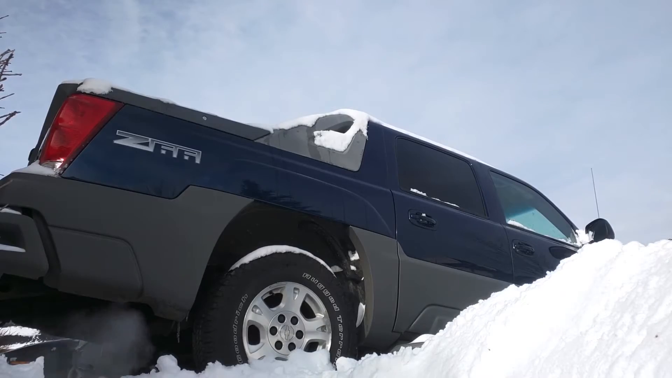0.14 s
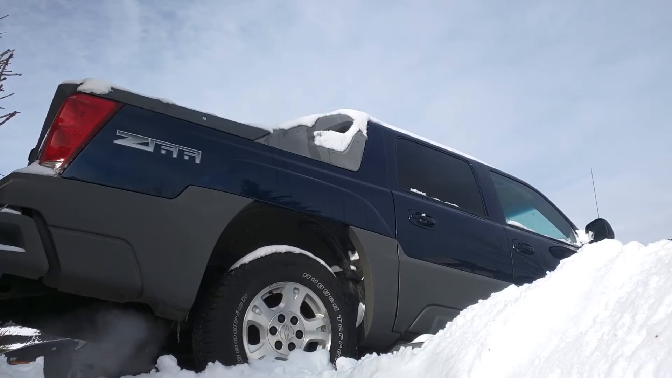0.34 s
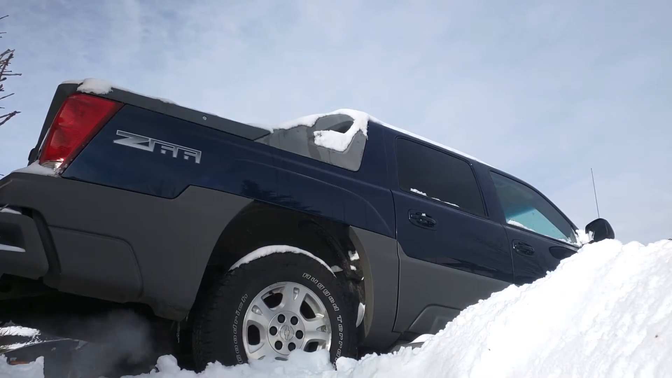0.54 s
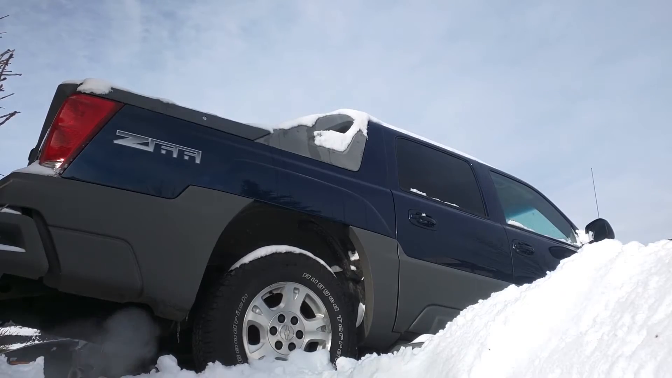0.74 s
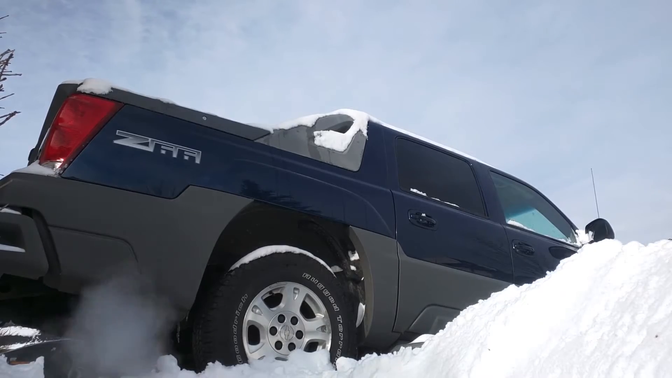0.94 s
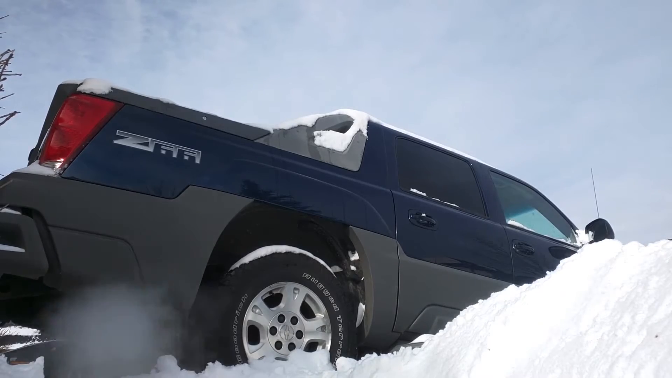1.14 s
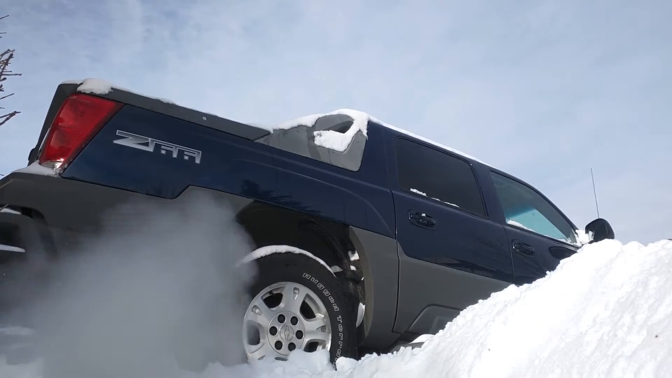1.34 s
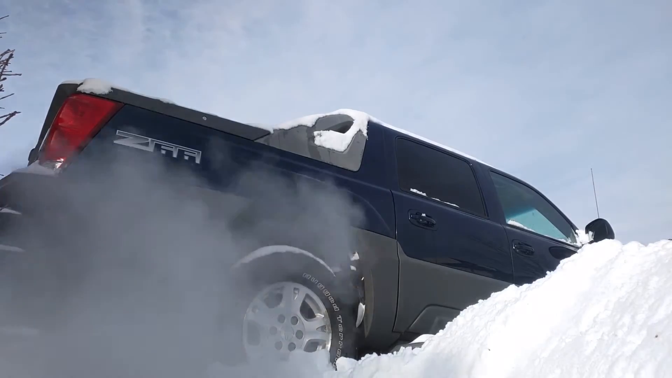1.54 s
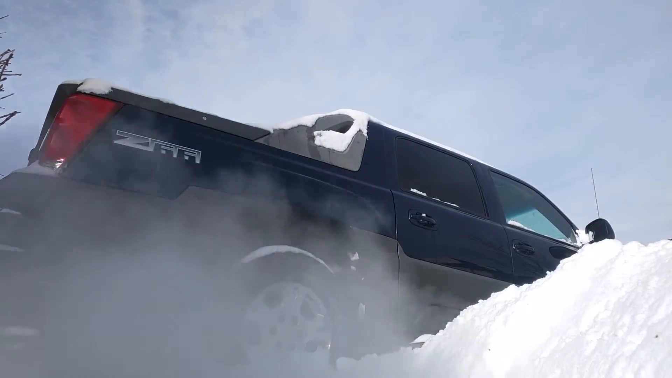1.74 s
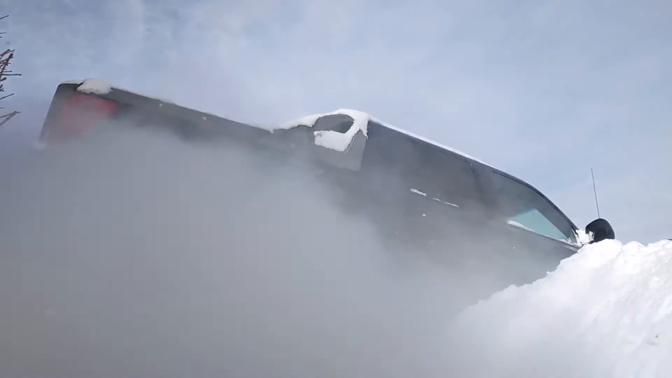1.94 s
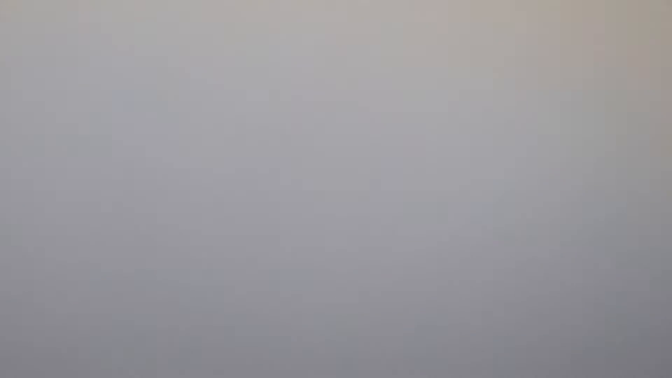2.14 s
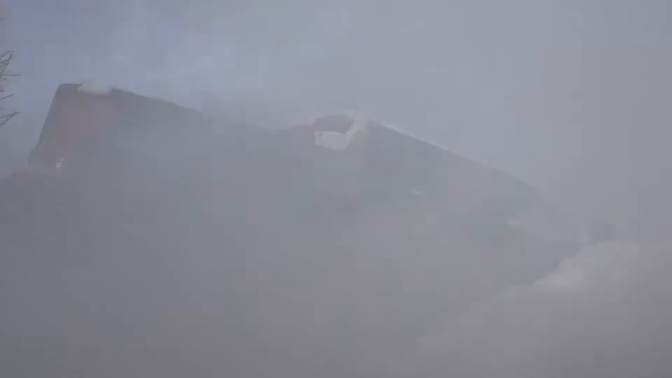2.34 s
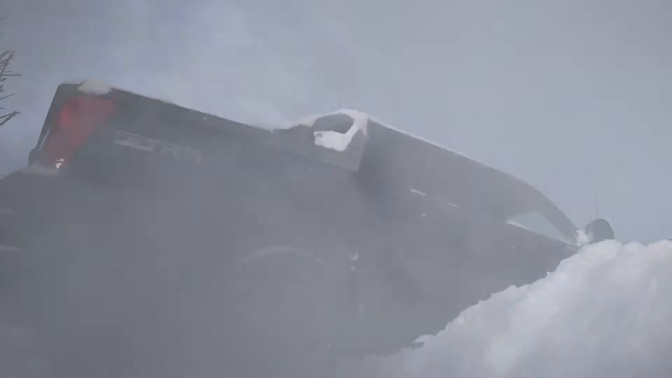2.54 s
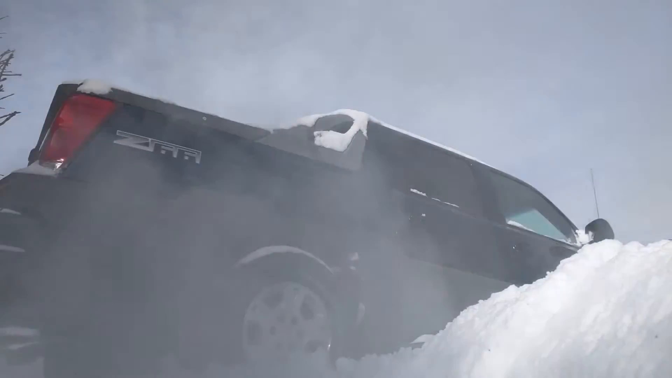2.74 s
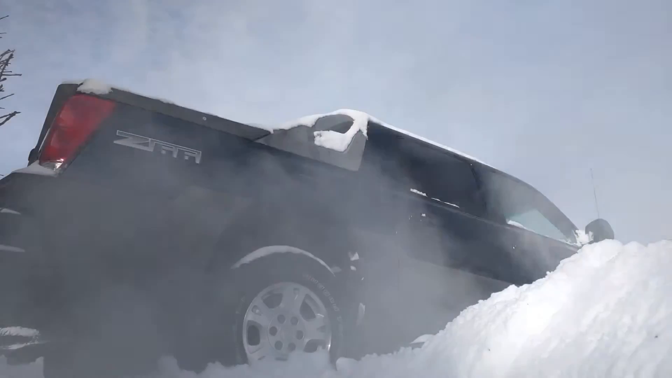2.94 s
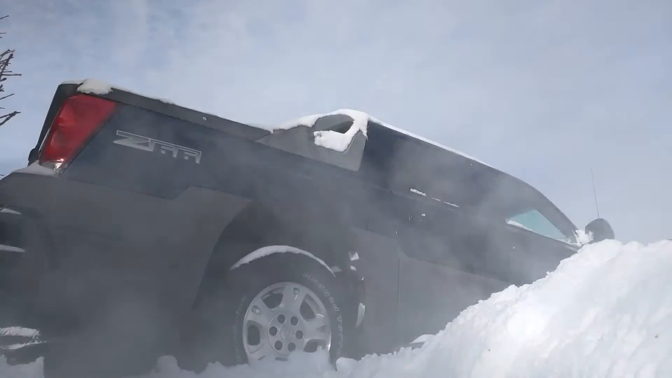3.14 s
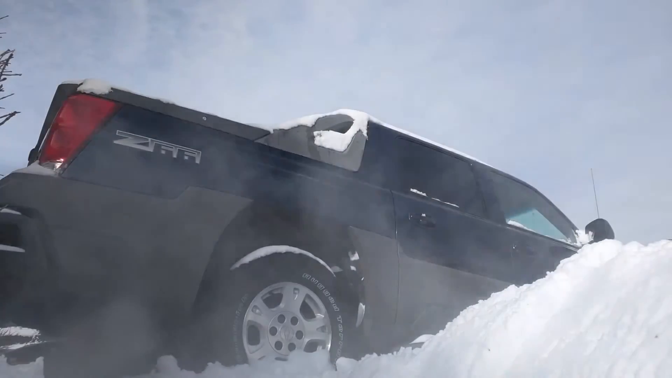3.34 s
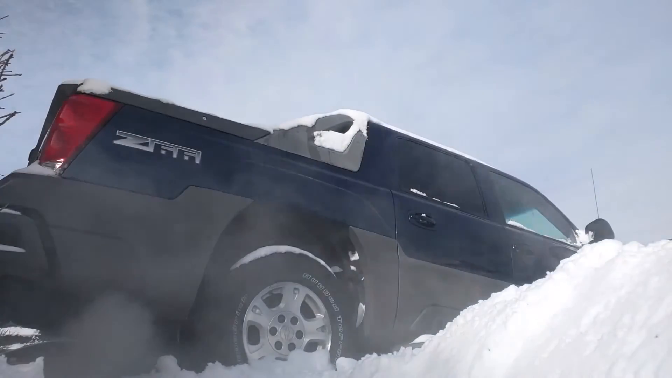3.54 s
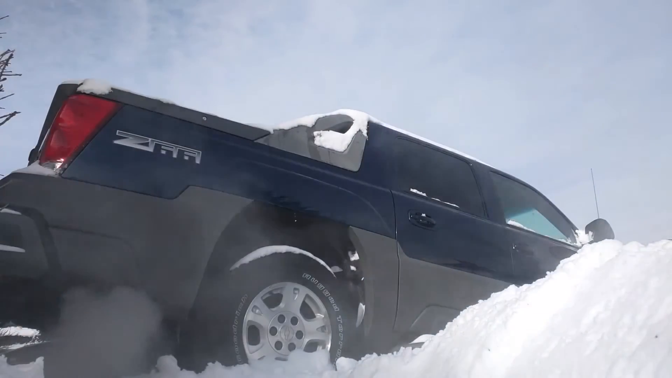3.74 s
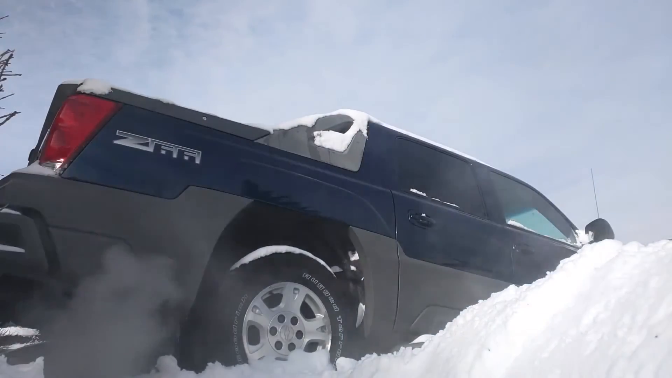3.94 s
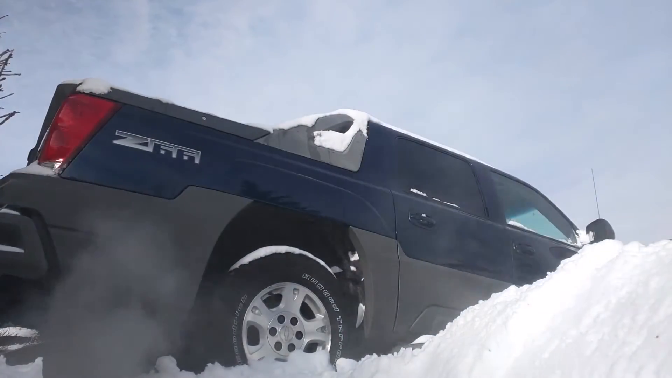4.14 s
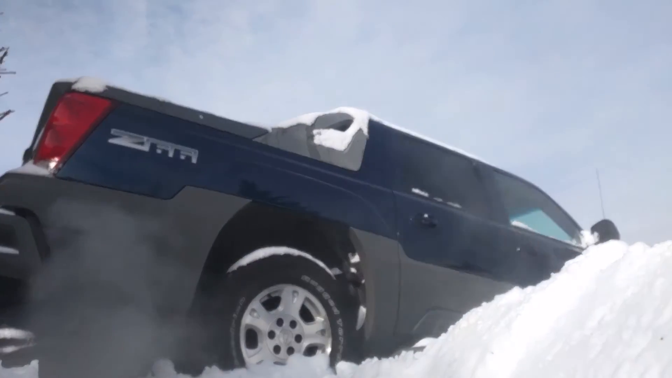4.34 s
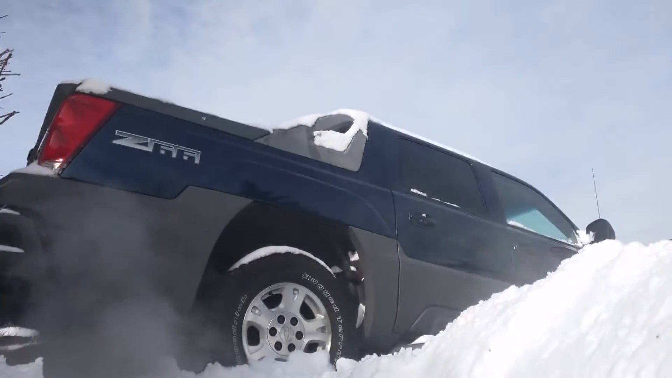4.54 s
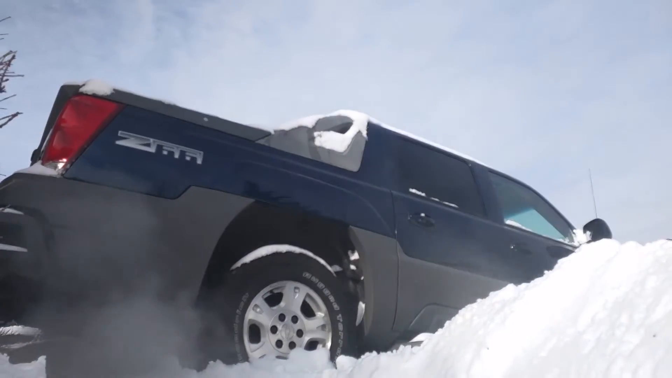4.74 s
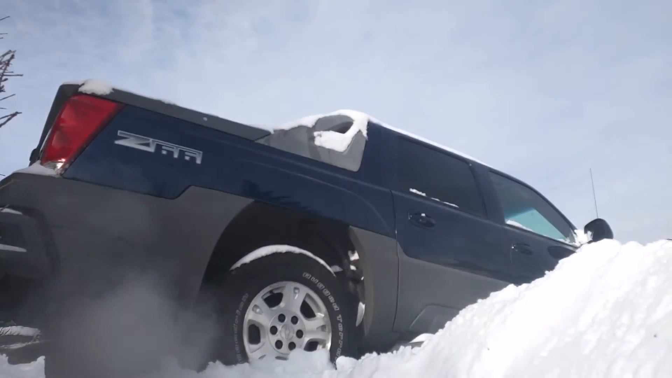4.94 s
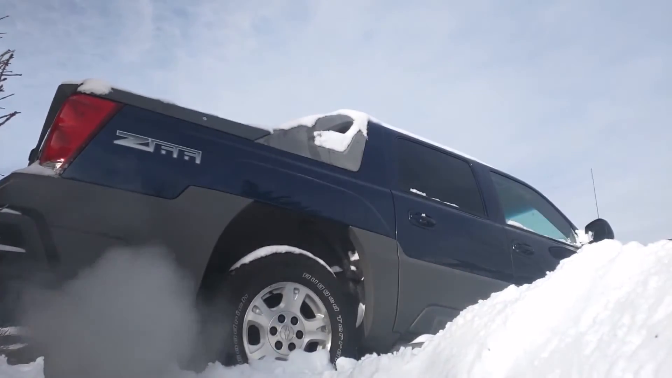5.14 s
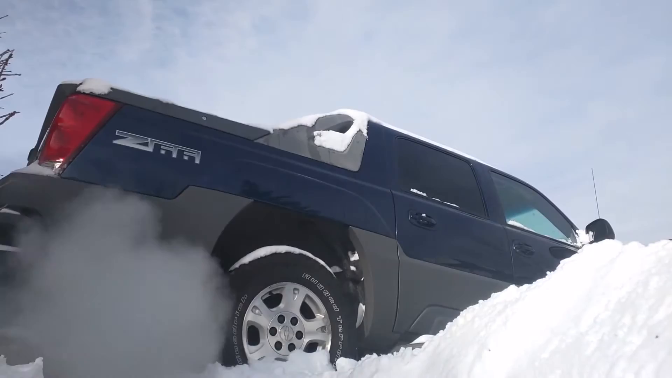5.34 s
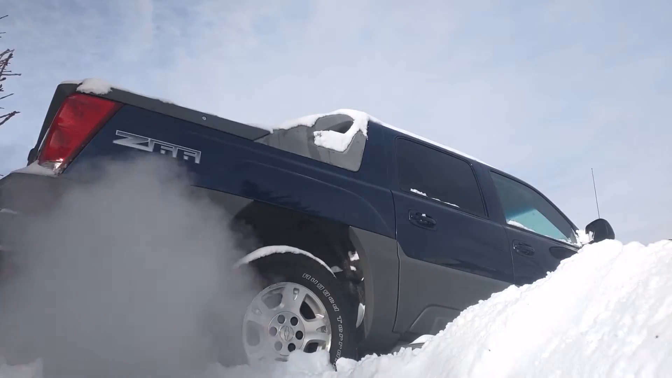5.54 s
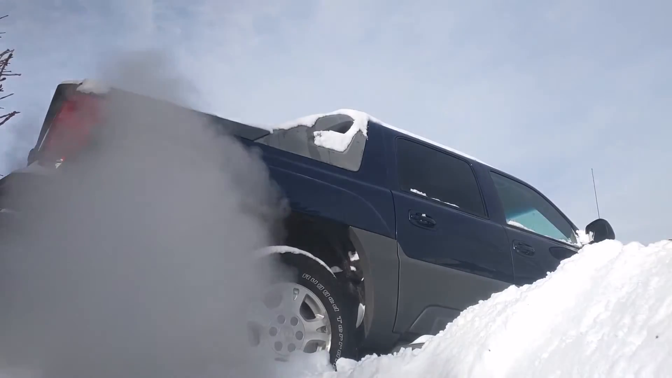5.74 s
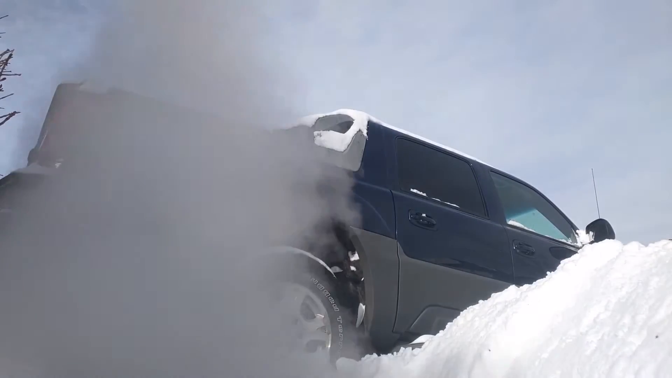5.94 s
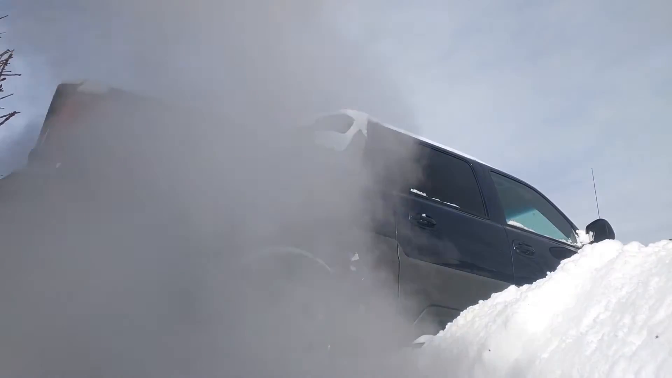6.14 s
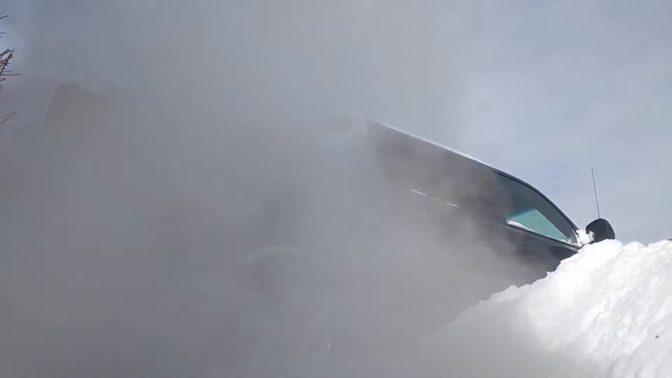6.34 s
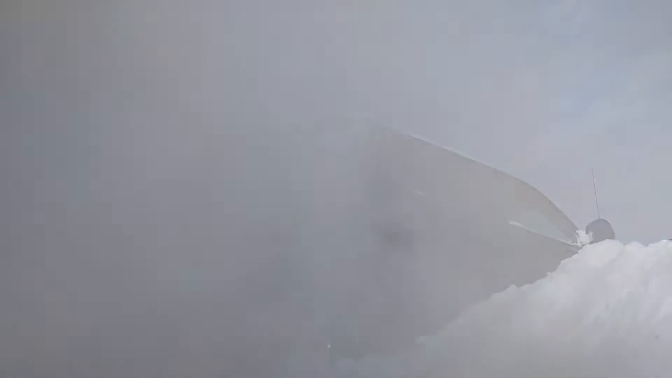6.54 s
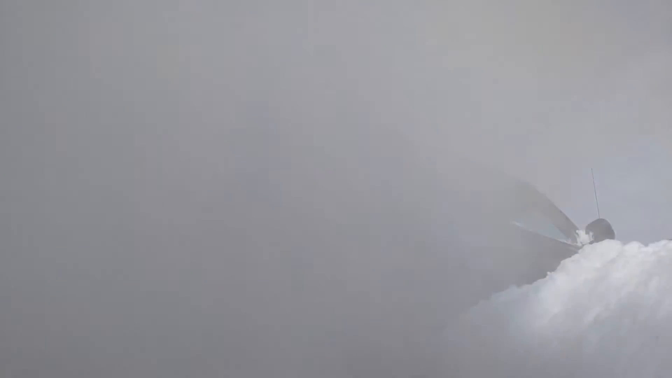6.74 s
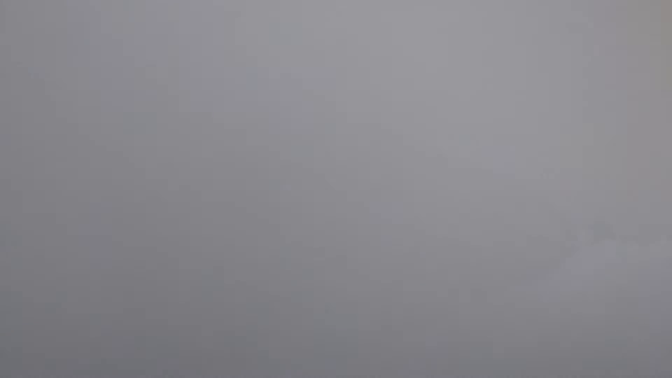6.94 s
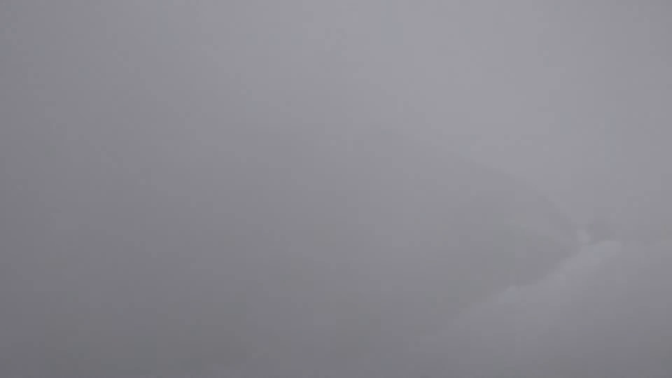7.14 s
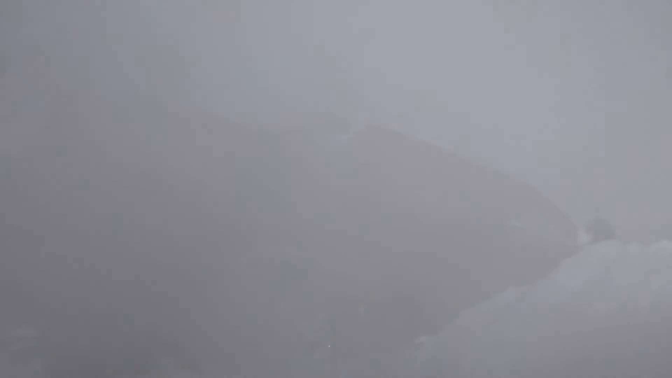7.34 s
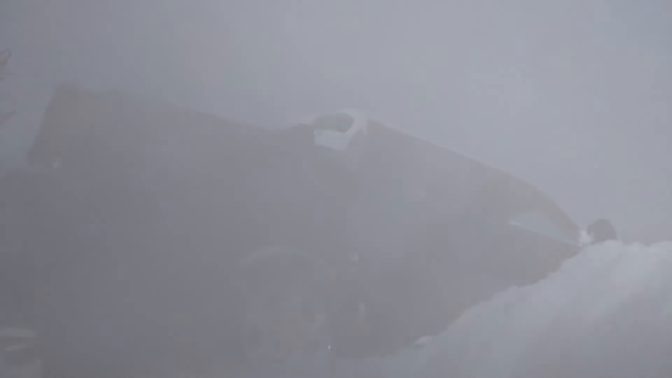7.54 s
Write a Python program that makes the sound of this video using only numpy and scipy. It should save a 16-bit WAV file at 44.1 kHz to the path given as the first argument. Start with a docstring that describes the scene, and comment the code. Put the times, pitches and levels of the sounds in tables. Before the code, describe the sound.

Outdoors, close behind a snowbound pickup, its big V8 idles with a low, uneven throb and clear metallic valve ticking. Three throttle stabs follow, the last a blaring roar, with a tyre hissing and crunching in snow. Exhaust gusts rumble over the microphone and specks spatter it. Revs sink to slow, hollow chugs with a few pops, then rise in one long howling pull and fall away in a droning burble.

```python
"""In deep snow, a stuck truck's cross-plane V8 idles, is blipped three times, sinks back, then is wound up in one long pull.
Speed and load set the levels: low orders boom through the pipe's resonances, orders and gas noise howl and puff,
slow firings chug, and pops, drones and hisses come from the tailpipe. Noise-driven taps ring the valve cover.
Thin metal rattles, a spinning tyre hisses and crunches, and the exhaust cloud buffets and spatters the microphone."""
import sys
import numpy as np
from scipy import signal
from scipy.fft import rfft, irfft, next_fast_len
from scipy.io import wavfile
from scipy.ndimage import map_coordinates

SR = 44100
rng = np.random.default_rng(int(sys.argv[2]) if len(sys.argv) > 2 else 0)


def unload_wav(signal):
    """Save mono or channel-first audio to the path in sys.argv[1] as 16-bit WAV at rate SR, clipped to [-1, 1]."""
    wavfile.write(
        sys.argv[1],
        SR,
        np.round(np.clip(np.atleast_2d(signal).T, -1, 1) * 32767).astype(np.int16),
    )


N = 334719
T = np.arange(N) / SR
IDLE_PER_S = 6.62  # four-stroke cycles per second

# Cylinders in firing order: (relative exhaust pulse strength, relative valve tick level [dB])
CYLINDERS = [(.92, -3), (.71, 2), (.86, -4), (.74, 5), (.81, -8), (.42, -5), (1.22, 2), (1.04, -6)]
# Boom orders: (order of the cycle, relative level with throttle shut [dB], more at full load [dB],
# more at idle [dB], share of the lope [0-1])
BOOM_ORDERS = [(1, 11.5, -5.5, -1.5, 0.18), (2, -2, -9.5, -8, 0.5), (3, 6, -5, -9.5, 1),
               (5, -9.5, 10, 2.5, 0), (6, -3.5, 2, -20, 0.1), (7, -19.5, 17.5, -17, 0),
               (8, -11, 19.5, 0.5, 0.08), (9, -10, -4.5, -16, 0.1), (11, -14, 12, -1.5, 0.28)]
# Upper resonances of the tailpipe: (frequency [Hz], relative level [dB])
RASP_COLOUR = [(500, -44.5), (710, -2.5), (770, 15), (855, 12.5), (930, 6), (1050, 6.5), (1230, 1.5),
               (1370, 6.5), (1520, 2.5), (1680, -7), (1850, -15), (2400, -37), (4000, -47.5)]


def amp(db):
    """Decibels to gain."""
    return 10 ** (np.asarray(db) / 20)


def unit(x):
    """Scales to rms 1."""
    return x / np.sqrt(np.mean(x ** 2) + 1e-20)


def noise():
    """White noise of rms 1."""
    return rng.standard_normal(N)


def wander(hz):
    """Slow random signal of rms 1, rolled off above the given rate."""
    size = next_fast_len(N)
    f = np.fft.rfftfreq(size, 1 / SR)
    spectrum = rfft(rng.standard_normal(size)) / (1 + (f / hz) ** 4)
    return unit(irfft(spectrum, size)[:N])


def grains(per_s, spread_db):
    """Random clicks of uneven size and either sign, rms 1."""
    hits = rng.random(N) < per_s / SR
    size = amp(spread_db * np.minimum(rng.exponential(1, N), 3))
    return unit(hits * size * np.sign(noise()))


def colour(x, points):
    """Minimum-phase filter with the given spectrum [Hz, dB] and unit energy."""
    hz, db = np.transpose(points)
    f = abs(np.fft.fftfreq(8192, 1 / SR))
    log_gain = np.log(amp(np.interp(np.log(f + 1), np.log(hz + 1), db)))
    ring = np.fft.ifft(np.exp(np.conj(signal.hilbert(log_gain)))).real[:len(f) // 2]
    return signal.oaconvolve(x, ring / np.linalg.norm(ring))[:N]


def lagged(x, lag_s):
    """One-pole smoothing with the given time constant."""
    keep = np.exp(-1 / (lag_s * SR))
    return signal.lfilter([1 - keep], [1, -keep], x)


def swell(peak_s, rise_s, fall_s):
    """A rounded rise to 1 and fall."""
    return np.exp(-((T - peak_s) / np.where(T < peak_s, rise_s, fall_s)) ** 2)


def swells(rows):
    """Joint gain of a table of swells, summed in power."""
    return np.sqrt(sum((amp(db) * swell(*shape)) ** 2 for *shape, db in rows))


def press(down_s, up_s, attack_s, lift_s=0.052):
    """One press of the pedal, 0-1: attack, hold, release."""
    attack = 1 - np.exp(-np.maximum(T - down_s, 0) / attack_s)
    return attack * np.exp(-np.maximum(T - up_s, 0) / lift_s)


def follow(law, speed, load):
    """Gain of a layer that follows speed and load."""
    idle_db, speed_db, load_db = law
    return amp(idle_db + speed_db * (speed - IDLE_PER_S) + load_db * load)


def idling(speed, span=1.2):
    """1 at idle, fading as the engine speeds up by span cycles per second."""
    return np.exp(-np.maximum(speed - IDLE_PER_S, 0) / span)


def add(mix, s, sound):
    """Mixes a sound in at the given time."""
    part = mix[max(round(s * SR), 0):][:len(sound)]
    part += sound[:len(part)]


def cloud(gust_db=2.0, breeze_db=-41, speck_db=4.0, spatter_db=-38, spread_db=6.0, knock_db=17, splash_s=0.00093):
    """The exhaust cloud rumbles over the microphone and spatters it; heavy specks knock on its case."""
    # Gusts on the microphone: (peak [s], rise [s], fall [s], relative level [dB])
    gust_swells = [(.95, 0.064, 0.15, -24.5), (1.62, 0.26, 0.24, -24), (2.65, 0.61, 0.44, -22.5),
                   (6.88, 0.94, 1, -41)]
    # Gust rumble: (frequency [Hz], relative level [dB])
    buffet_colour = [(5, -74), (15, 3), (28, -13.5), (55, -1), (90, -3.5), (130, -10.5), (200, -20),
                     (400, -14), (1200, -78.5)]
    # Fine spatter: (peak [s], rise [s], fall [s], peak rate [specks/s])
    spatter_swell = (2.19, 0.024, .15, 2400)
    # Largest specks: (time [s], relative level [dB])
    large_specks = [(1.682, -28), (1.69, -28), (1.735, -41), (2.1045, -12.5), (2.136, -25), (2.155, -16),
                    (2.166, -18), (2.173, -10.5), (2.203, -16), (2.314, -21), (2.428, -20), (2.463, -21),
                    (2.492, -20), (2.498, -23), (2.5198, -25), (2.532, -28), (2.733, -21), (2.7747, -21.5),
                    (2.787, -27), (2.892, -26), (2.9823, -31)]
    # Speck impact: (frequency [Hz], relative level [dB])
    speck_colour = [(800, -26), (2000, -2), (4000, -5), (6000, -1.5), (11000, -3), (16000, -7.5)]
    # Case knock: (frequency [Hz], relative level [dB])
    case_colour = [(800, -25), (1600, 4), (2200, -3), (3000, -12), (6000, -42)]
    gust_gain = np.hypot(amp(breeze_db), amp(gust_db) * swells(gust_swells))
    gusts = gust_gain * unit(colour(noise(), buffet_colour))

    *shape, per_s = spatter_swell
    hits = rng.random(N) < per_s * swell(*shape) / SR
    spatter = hits * amp(spatter_db + spread_db * np.minimum(rng.exponential(1, N), 3))

    s, peak_db = np.transpose(large_specks)
    large = np.zeros(N)
    large[np.round(s * SR).astype(int)] = amp(peak_db)
    # each large speck bursts into droplets
    splash = np.exp(-T[:SR // 50] / splash_s) * rng.standard_normal(SR // 50)
    burst = signal.oaconvolve(large, splash / np.linalg.norm(splash))[:N]
    specks = colour(spatter + amp(speck_db) * burst, speck_colour)
    knocks = amp(knock_db) * colour(large ** 2, case_colour)  # squaring favours the heaviest
    return gusts + specks + knocks


def tyre(gain, wheel_lag_s=0.0083):
    """The tread flings snow, a fine hiss with icy grains in it, and crunches in clumps where it bites."""
    # Flung snow: (frequency [Hz], relative level [dB])
    spray_colour = [(2500, -53), (5000, -4), (7000, 0), (10000, 3.5), (13000, -2.5), (16000, -8)]
    # Tread crunching on ice: (peak [s], rise [s], fall [s], level [dB])
    crunch_swells = [(.98, 0.073, 0.14, -44), (1.35, 0.018, 0.14, -41), (1.96, 0.094, 0.1, -42.5),
                     (2.41, 0.046, 0.049, -37.5), (2.62, 0.12, 0.037, -46), (7.0, 0.05, 0.088, -39),
                     (7.1, .008, .025, -36)]
    # Ice crunch: (frequency [Hz], relative level [dB])
    crunch_colour = [(1800, -33), (3000, 5), (3900, 1.5), (4900, 2), (6000, -4), (9000, -16), (16000, -37)]
    snow = noise() + grains(per_s=2500, spread_db=4)
    spray = lagged(gain, wheel_lag_s) * unit(colour(snow, spray_colour))
    ice = grains(per_s=1500, spread_db=3.5) * amp(4 * wander(hz=60))
    return spray + swells(crunch_swells) * unit(colour(ice, crunch_colour))


def rattle(cycles, hz=3700, width_hz=650, flutter_db=3):
    """Thin metal buzzes with the firings: gas puffs through a doubled resonance."""
    # Bouts of rattle: (peak [s], rise [s], fall [s], level [dB])
    rattle_swells = [(.96, .05, 0.13, -39), (1.34, .02, .14, -41), (2.445, 0.053, 0.02, -32),
                     (2.6, 0.063, 0.063, -47.5), (5.1, 0.13, 0.57, -45.5), (7.39, 0.15, 0.067, -41)]
    band = signal.iirpeak(hz, hz / width_hz, SR)
    buzz = puffs(cycles, steady=0.43, length=1.0)
    buzz = signal.lfilter(*band, signal.lfilter(*band, buzz))
    return swells(rattle_swells) * unit(buzz * amp(flutter_db * wander(hz=50)))


def valves(cycles, speed, load, level_db=-49.5, ring_s=0.0045, lag_cycles=-.015):
    """Each valve ticks once a cycle, three louder, over fine rocker chatter; all ring the cover."""
    # Dry tick: (frequency [Hz], relative level [dB])
    valve_colour = [(1200, -33), (2100, -2), (2450, 8), (2750, 5), (3500, 10), (4400, 8), (5000, 0),
                    (6400, -2), (7800, -3), (8500, -14), (9700, -9), (12000, -14), (15000, -22)]
    # Modes of the cover: (frequency [Hz], width [Hz], relative level [dB])
    cover_modes = [(2400, 30, 1), (2600, 50, -6), (2725, 45, -9), (3010, 50, -5), (3390, 110, 7),
                   (3560, 100, 8), (3690, 70, 5), (4460, 110, -4), (5070, 70, -8), (5380, 90, -10),
                   (5610, 90, -8), (7100, 200, -13), (7800, 150, -11), (9500, 400, -12), (12000, 900, -14)]
    tick_spread_db, mode_spread_db, chatter, cover_db = 1.2, 3.5, .3, 7
    later_db, load_db, speed_db = -5.5, 8, -.9  # speed_db is per cycle/s above idle

    tick_db = np.array(CYLINDERS)[:, 1]
    beat = np.floor((cycles - lag_cycles) * len(tick_db)).astype(int)
    at = np.flatnonzero(np.diff(beat))
    taps = np.zeros(N)
    taps[at] = amp(tick_db[beat[at + 1] % len(tick_db)] + tick_spread_db * rng.standard_normal(len(at)))
    fade = np.exp(-1 / (ring_s * SR))
    # each tick builds up through the block
    clatter = unit(signal.lfilter([1], np.poly([fade, fade]), taps) * noise())
    knocks = clatter + chatter * grains(per_s=330, spread_db=-3)

    # each tick favours other modes
    favour = amp(mode_spread_db * rng.standard_normal((len(cover_modes), beat[-1] + 1)))
    ring = 0
    for (hz, width_hz, db), own in zip(cover_modes, favour):
        mode = signal.iirpeak(hz, hz / width_hz, SR)
        ring = ring + amp(db) * unit(signal.lfilter(*mode, knocks * own[beat]))

    softened = np.interp(T, [1, 3], [0, 1])  # the ticks grow softer between 1 and 3 s
    gain_db = level_db + later_db * softened + load_db * np.minimum(load, .4)
    gain_db = gain_db + speed_db * (speed - IDLE_PER_S)
    return amp(gain_db) * (unit(colour(clatter, valve_colour)) + amp(cover_db) * unit(ring))


def puffs(cycles, steady, length, uneven=1):
    """Turbulence that leaps up at each firing and fades before the next; length in firing intervals."""
    strength = np.array(CYLINDERS)[:, 0]
    which, age = np.divmod(cycles % 1 * len(strength), 1)
    pulse = (strength[which.astype(int)] / strength.mean()) ** uneven * np.exp(-age / length)
    return unit(noise() * (steady + pulse))


def rush(cycles, speed, load, flutter_db=1.5):
    """Gas hisses past the lip of the pipe, throbbing with the firings."""
    # Hiss: (frequency [Hz], relative level [dB])
    rush_colour = [(900, -29), (1800, 9), (2400, 7.5), (3200, 6), (3680, 7), (4050, 4), (5200, -0.5),
                   (6500, -6), (9000, -17), (16000, -36)]
    # Hiss law: (level at idle [dB], more per cycle/s above idle [dB], more at full load [dB])
    rush_law = (-57.5, 0.64, 5.37)
    # Surges as the throttle snaps open or revs collapse: (peak [s], rise [s], fall [s], level [dB])
    surge_swells = [(.96, 0.07, 0.13, -42.5), (1.38, 0.073, 0.071, -43.5), (2.43, 0.26, 0.087, -38),
                    (7.02, 0.12, 0.25, -34.5)]
    air = puffs(cycles, steady=11.0, length=1.0) * amp(flutter_db * wander(hz=36.0))
    gain = np.hypot(follow(rush_law, speed, load), swells(surge_swells))
    return gain * unit(colour(air, rush_colour))


def drone(hz=123, sag_hz_per_s=22, waver=0.011):
    """A low resonance of the pipe sounds on the overrun, wavering and gliding steadily down in pitch."""
    # Drones: (peak [s], rise [s], fall [s], level [dB])
    drone_swells = [(2.522, 0.016, .03, -20), (7.44, 0.11, 0.069, -16.5)]
    out = 0
    for peak_s, rise_s, fall_s, db in drone_swells:
        pitch_hz = hz * (1 + waver * wander(hz=14)) - sag_hz_per_s * (T - peak_s)
        tone = np.sqrt(2) * np.sin(2 * np.pi * np.cumsum(pitch_hz) / SR)
        out = out + amp(db) * swell(peak_s, rise_s, fall_s) * tone
    return out


def pops(decay_s=0.009):
    """Late-burning gas pops and rings the tailpipe: decaying noise through its resonances."""
    # Pops, mostly on the overrun: (time [s], level before the pipe [dB])
    pop_hits = [(2.549, -15), (2.64, -14), (2.882, -22), (4.054, -29), (4.87, -27), (5.105, -24),
                (7.345, -21), (7.452, -24)]
    gain = sum(amp(db) * (T >= s) * np.exp(-abs(T - s) / decay_s) for s, db in pop_hits)
    return colour(gain * noise(), RASP_COLOUR)


def chugs(cycles, speed, length_s=0.0092, spread_db=3.0, detune=0.033, fade_span=9, below_per_s=13):
    """At low revs single firings stand out, each a short note of the pipe."""
    # Hardest single chugs: (time [s], frequency [Hz], peak level [dB])
    hard_chugs = [(3.715, 395, -23), (3.788, 400, -22.5), (4.26, 440, -26), (4.388, 410, -22),
                  (4.517, 408, -25), (4.612, 392, -20.5), (4.762, 860, -28.5), (4.872, 410, -24),
                  (4.873, 830, -38)]
    # Firings that stand out in each slow cycle: (place in cycle [0-1], mean frequency [Hz],
    # typical peak level at idle [dB])
    lope_firings = [(0.237, 836, -36), (.52, 1375, -40.5), (0.601, 375, -30.5), (0.851, 420, -30.5),
                    (0.872, 880, -41)]
    t = np.arange(-3 * length_s, 3 * length_s, 1 / SR)
    rows = [(s, hz, amp(db)) for s, hz, db in hard_chugs]
    slow = idling(speed, span=fade_span) * (speed < below_per_s)
    for place, hz, db in lope_firings:
        for at in np.flatnonzero(np.diff(np.floor(cycles - place))):
            note_hz = hz * (1 + detune * rng.standard_normal())
            gain = slow[at] * amp(db + spread_db * rng.standard_normal())
            rows.append((T[at], note_hz, gain))
    out = np.zeros(N)
    for s, hz, gain in rows:
        note = np.exp(-(t / length_s) ** 2) * np.cos(2 * np.pi * (hz * t + rng.random()))
        add(out, s + t[0], gain * note)
    return out


def howl(cycles, speed, size=2048, count=140, frames_per_s=100, drift_share=.5, drift_hz=3):
    """The part of the exhaust that returns every cycle: orders wavering on their own in level and phase."""
    # Orders that stand out or fall short: (order of the cycle, level against the rest [dB])
    singing_orders = [(13, 0), (14, -7), (15, -7), (16, 4), (17, -2), (18, -3), (19, 2), (20, -3), (21, 5),
                      (22, -2), (23, -4), (24, 6), (29, 4), (33, 4), (34, 3), (35, -3), (36, -6), (37, 9),
                      (38, -4), (39, -8), (40, 6), (41, -2), (42, -4), (43, 4)]
    # Pipe resonances where those differences show: (frequency [Hz], share [0-1])
    sing_range = [(300, 1), (480, 1), (560, .1), (720, .1), (775, 1), (880, 1), (960, .15)]
    db = np.zeros(count)
    for order, extra_db in singing_orders:
        db[order] = extra_db

    frames = int(T[-1] * frames_per_s) + 2
    chance = rng.standard_normal((frames, count)) + 1j * rng.standard_normal((frames, count))
    lowpass = signal.butter(2, drift_hz, fs=frames_per_s, output="sos")
    drift = signal.sosfilt(lowpass, chance, axis=0)
    waver = (1 + drift_share * drift / drift.std()) / np.hypot(1, drift_share)

    frame_speed = np.interp(np.arange(frames) / frames_per_s, T, speed)
    hz = np.outer(frame_speed, np.arange(count))
    level = amp(db * np.interp(hz, *np.transpose(sing_range)))
    phase = np.exp(2j * np.pi * rng.random(count))  # each order starts at a random phase
    above_boom = np.arange(count) > round(BOOM_ORDERS[-1][0])
    shapes = irfft(level * waver * phase * above_boom, size) * size
    place = [T * frames_per_s, cycles % 1 * size]
    return map_coordinates(shapes, place, order=1, mode="grid-wrap") * np.sqrt(speed / SR)


def heated(x, points, speed, shift=0.0029, lag_s=0.17):
    """Pipe colour whose resonances rise, against their mean, as the gas heats up behind the revs."""
    # shift: share per cycle/s
    stretch = 1 + shift * lagged(speed - IDLE_PER_S, lag_s)
    clock = np.cumsum(stretch / stretch.mean()) / SR
    return unit(np.interp(clock, T, colour(np.interp(T, clock, x), points)))


def boom(cycles, speed, load, lope_db, level_db=-6.5, dispersion=.19, waver_db=1.3):
    """Low orders sweep through the pipe's resonances; uneven banks make the odd ones strong."""
    # What the pipe passes: (frequency [Hz], relative level [dB])
    pipe_response = [(7, -38), (15, -49), (22, -32), (30, -23.5), (50, -17.5), (66, -19), (92, -31.5),
                     (110, -30), (125, -21.5), (150, -40.5), (170, -23.5), (188, -29.5), (205, -17.5),
                     (232, -15.5), (250, -24.5), (280, -30)]
    out = 0
    for order, shut_db, load_db, idle_db, lope in BOOM_ORDERS:
        k = round(order)
        db = shut_db + load_db * load + idle_db * idling(speed, span=7.0)
        db = db + lope * lope_db + waver_db * wander(hz=3.8)
        db = db + np.interp(k * speed, *np.transpose(pipe_response))
        out = out + amp(db) * np.cos(2 * np.pi * (k * cycles + dispersion * k ** 2))
    return amp(level_db) * np.sqrt(2) * out


def exhaust(cycles, speed, load, clean, blare, idle_lump=0.23, flutter_db=1.47):
    """Howl and puffs ring muffler and tailpipe; a wide-open throttle flattens them into a blare."""
    # Muffler body: (frequency [Hz], relative level [dB])
    body_colour = [(60, -56), (110, 4.5), (165, -5.5), (230, -3.5), (280, 0.5), (315, -5), (375, 6.5),
                   (435, 4.5), (490, -2.5), (560, -7.5), (680, -9), (800, -16.5), (1200, -53.5)]
    # Wide-open blare: (frequency [Hz], relative level [dB])
    blare_colour = [(70, -8), (130, -20.5), (200, 3.5), (285, 7), (350, -3), (470, -2), (560, 4),
                    (640, -1.5), (715, -3), (830, -9.5), (1000, 1), (1250, -4.5), (1500, -1), (1750, -22),
                    (2500, -51.5)]
    # Laws: (relative level at idle [dB], more per cycle/s above idle [dB], more at full load [dB])
    body_law = (-39.5, 0.65, 1)
    rasp_law = (-44, 0.76, 8.84)
    blare_law = (-29, 0.077, 6.5)
    # Hollow swells of the muffler: (peak [s], rise [s], fall [s], relative level [dB])
    hollow_swells = [(1.2, 0.17, .2, -30), (2.45, 0.22, 0.27, -30), (5.3, 0.25, 0.6, -30.5),
                     (7.05, 0.16, 1, -28)]
    # Growls under load and burbles on the overrun: (peak [s], rise [s], fall [s], relative level [dB])
    flare_swells = [(1.08, 0.031, 0.29, -32), (1.45, 0.13, 0.25, -30.5), (2.42, 0.24, 0.096, -23.5),
                    (2.62, 0.03, 0.025, -24), (5.86, 0.36, 0.21, -26), (7, 0.16, 0.28, -21)]
    rough, blare = np.clip(1 - clean, 0, 1), np.clip(blare, 0, 1)
    gas = puffs(cycles, steady=1.0, length=1.0, uneven=1 + idle_lump * idling(speed))
    drive = np.sqrt(1 - rough) * howl(cycles, speed) + np.sqrt(rough) * gas
    drive = drive * amp(flutter_db * rough * wander(hz=37.3))  # uneven combustion where the howl is not clean
    body_gain = amp(4.0) * np.hypot(follow(body_law, speed, load), swells(hollow_swells))
    rasp_gain = amp(-0.5) * np.hypot(follow(rasp_law, speed, load), swells(flare_swells))
    piped = body_gain * heated(drive, body_colour, speed) + rasp_gain * heated(drive, RASP_COLOUR, speed)
    wide_open = follow(blare_law, speed, load) * unit(colour(drive, blare_colour))
    return np.sqrt(1 - blare) * piped + np.sqrt(blare) * wide_open


def scene():
    """The pedal sets the load; one crankshaft times the firings, valve ticks, rattle, chugs and orders."""
    # Engine speed: (time [s], four-stroke cycles per second [1/s])
    rev_curve = [(0, IDLE_PER_S), (.93, IDLE_PER_S), (1.02, 11.1), (1.09, 14), (1.32, 14.8), (1.54, 23.8),
                 (1.86, 19.15), (2, 26.95), (2.12, 32), (2.51, 24.3), (2.96, 16.6), (3.59, 12.15),
                 (4.22, 7.7), (4.65, 8.1), (5.05, 10.2), (5.3, 15.1), (5.45, 17.35), (5.6, 19.1),
                 (5.81, 20.6), (6.04, 22.65), (6.33, 24.4), (6.47, 26.4), (6.78, 30.95), (7.06, 25.9),
                 (7.34, 21.6), (7.59, 18.3)]
    # Throttle, from cold idle through three blips and a light touch to a three-stage pull:
    # (opens [s], shuts [s], attack [s], load [0-1], lope of the two banks [dB], snow spray [dB],
    # clean howl share before limits [0-1], blare share [0-1])
    pedal_presses = [(-.1, 0.906, 0.018, 0.25, 3, -69, 0.08, 0.03),
                     (0.903, 1.068, 0.025, 0.85, -4.5, -56, 0, 0.22),
                     (1.05, 1.3, 0.024, 0.56, -4.5, -75, .5, 0),
                     (1.317, 1.55, 0.021, 1, 6.5, -49, 0.42, 0.54),
                     (1.855, 2.135, 0.0083, 0.94, 6.5, -47.5, 0.45, 0.94),
                     (4.292, 5.096, 0.4, 0.6, -1.5, -69, 0, 0.03),
                     (5.08, 5.554, 0.069, 0.98, -6.5, -56, 0.53, 0.03),
                     (5.558, 6.252, 0.03, 0.73, -12.5, -58, 0.61, 0.01),
                     (6.25, 6.737, 0.031, 0.87, 1.5, -54.5, 0.45, 0.84)]
    # Spray between presses: (level at idle [dB], more per cycle/s above idle [dB], more at full load [dB])
    coast_law = (-71.5, 0.89, 0)
    clean_coasting = 0.22  # least clean share
    even_lope_db, even_clean = -7, .8  # banks this even raise the least clean share to even_clean

    speed = np.interp(T, *np.transpose(rev_curve))
    presses = np.array([press(*row[:3]) for row in pedal_presses])
    *_, loads, lopes_db, sprays_db, cleans, blares = np.transpose(pedal_presses)
    load, lope_db, blare = loads @ presses, lopes_db @ presses, blares @ presses
    even = np.clip(lope_db / even_lope_db, 0, 1)
    clean = np.clip(np.maximum(cleans @ presses, clean_coasting), even_clean * even, 1)
    spray = np.hypot(amp(sprays_db) @ presses, follow(coast_law, speed, load))
    cycles = np.cumsum(speed * (1 + .002 * wander(hz=23))) / SR

    around = cloud() + tyre(spray) + rattle(cycles) + valves(cycles, speed, load)
    tailpipe = rush(cycles, speed, load) + drone() + pops() + chugs(cycles, speed)
    tailpipe = tailpipe + boom(cycles, speed, load, lope_db) + exhaust(cycles, speed, load, clean, blare)
    return (around + tailpipe)[None]


def record(dry, edge_hz=15900):
    """Band limit: a linear-phase low-pass."""
    lowpass = signal.firwin(511, edge_hz, window=("kaiser", 9), fs=SR)
    return signal.oaconvolve(dry, lowpass[None], "same")


dry = scene()
out = record(dry)
unload_wav(out)
```